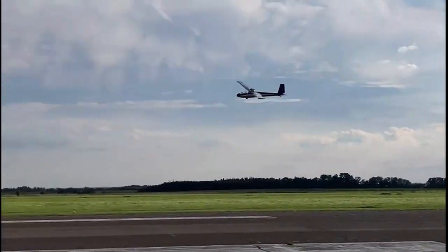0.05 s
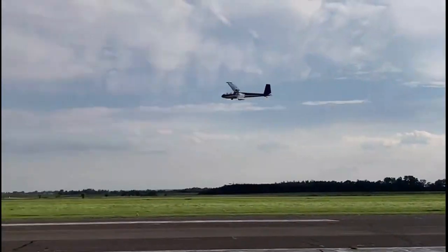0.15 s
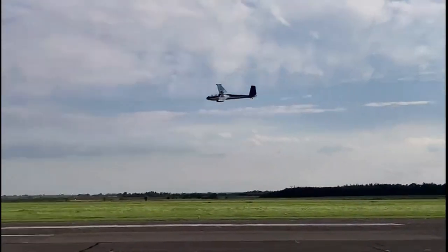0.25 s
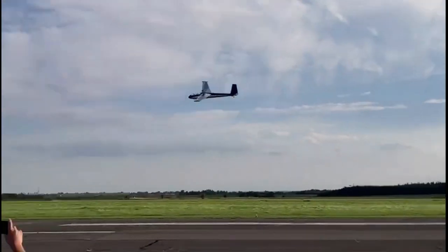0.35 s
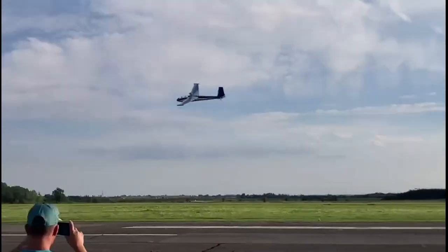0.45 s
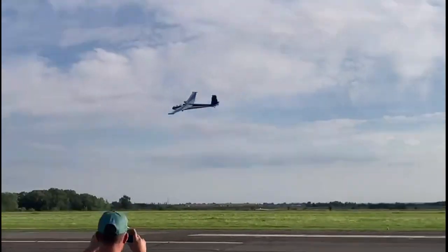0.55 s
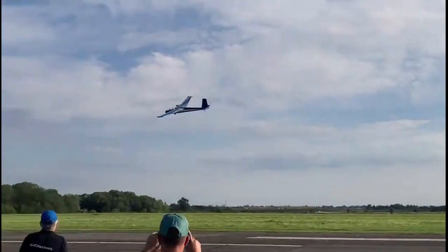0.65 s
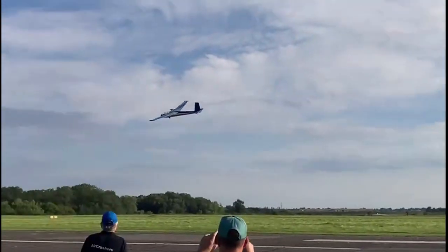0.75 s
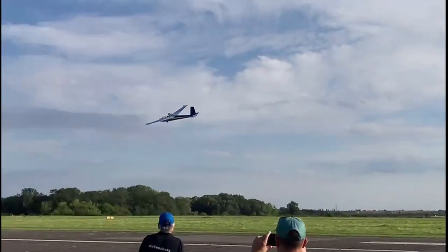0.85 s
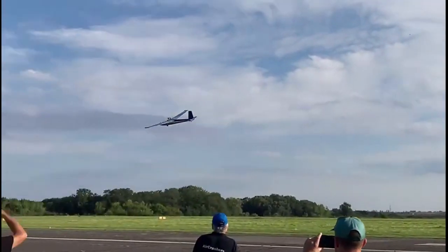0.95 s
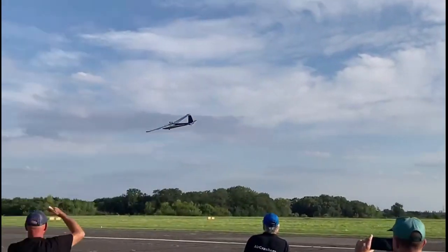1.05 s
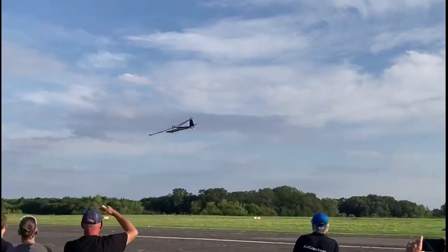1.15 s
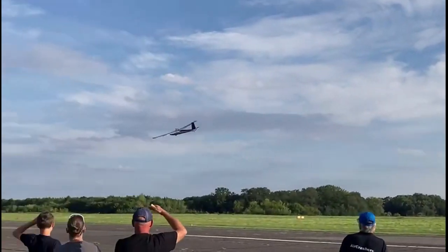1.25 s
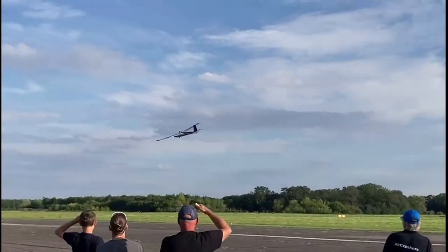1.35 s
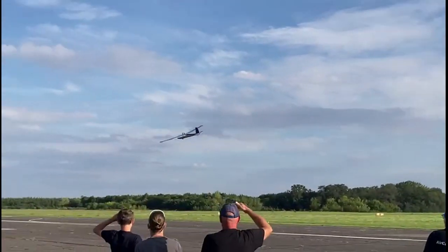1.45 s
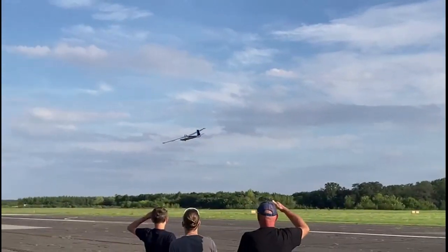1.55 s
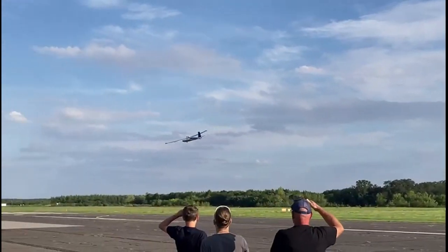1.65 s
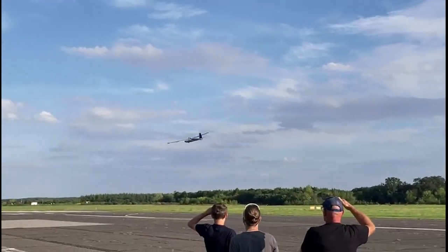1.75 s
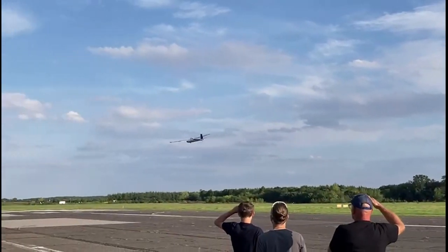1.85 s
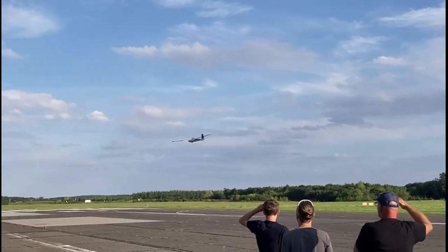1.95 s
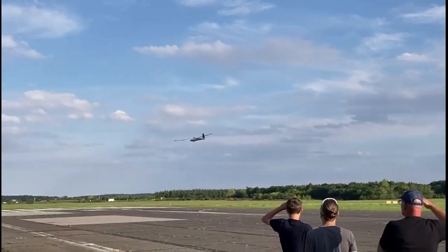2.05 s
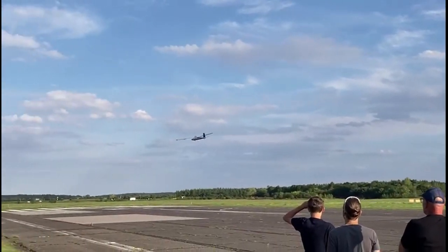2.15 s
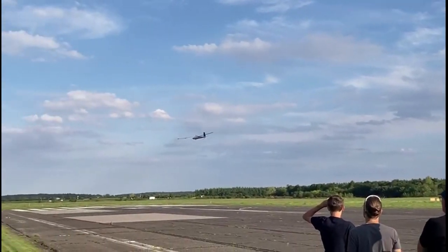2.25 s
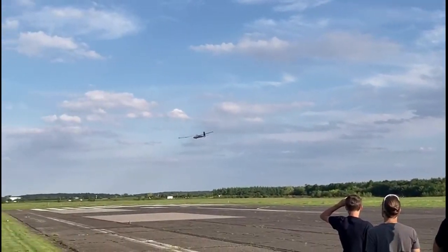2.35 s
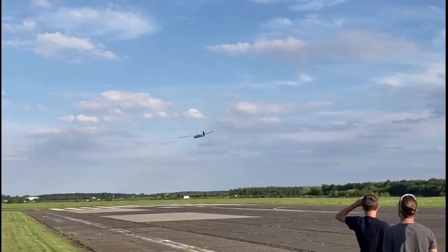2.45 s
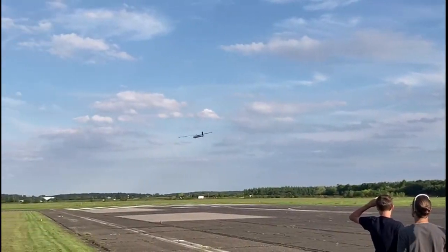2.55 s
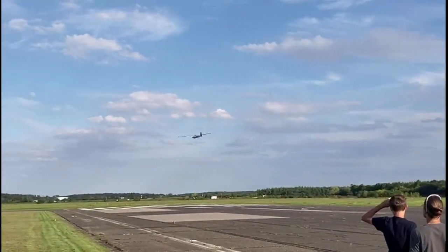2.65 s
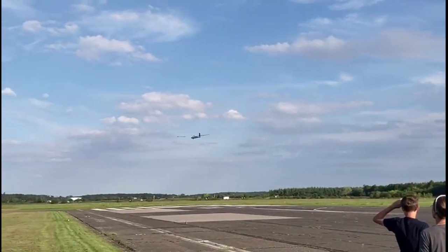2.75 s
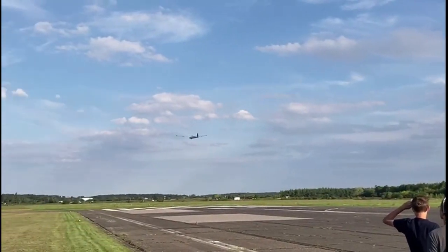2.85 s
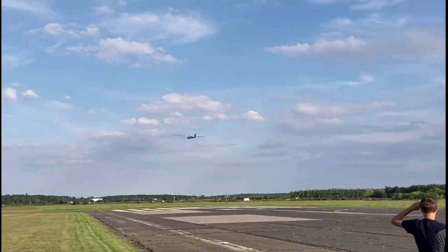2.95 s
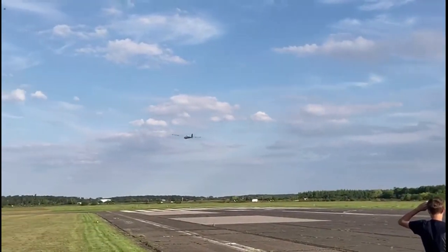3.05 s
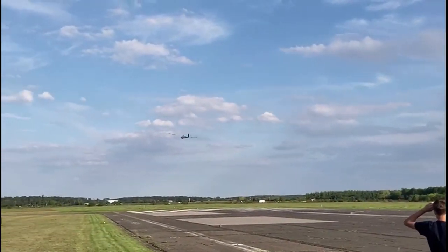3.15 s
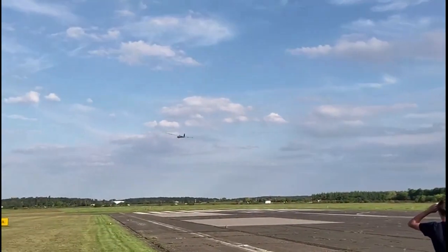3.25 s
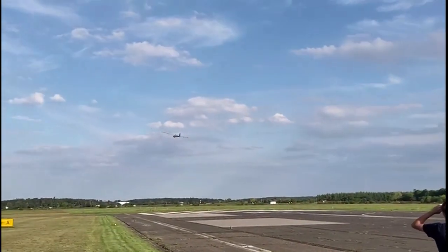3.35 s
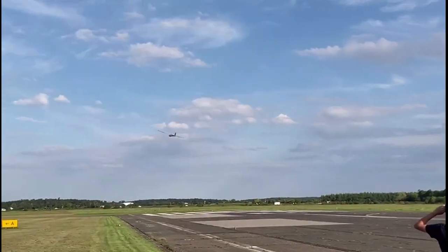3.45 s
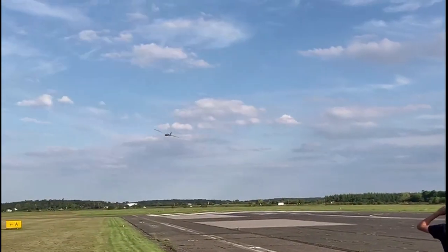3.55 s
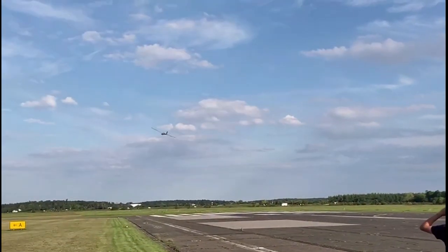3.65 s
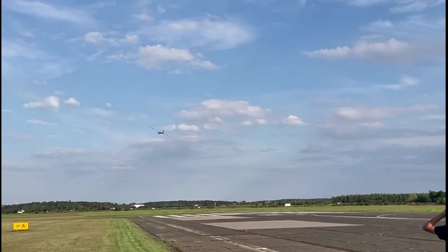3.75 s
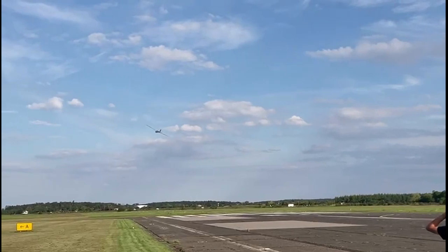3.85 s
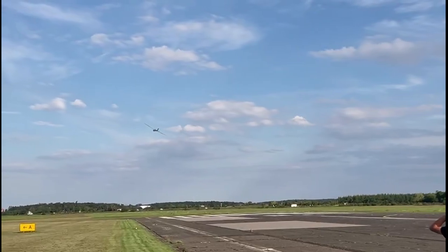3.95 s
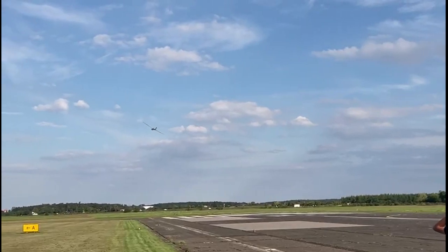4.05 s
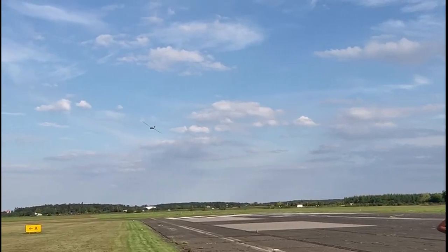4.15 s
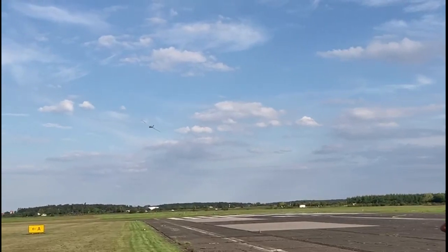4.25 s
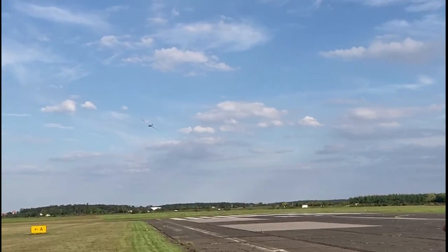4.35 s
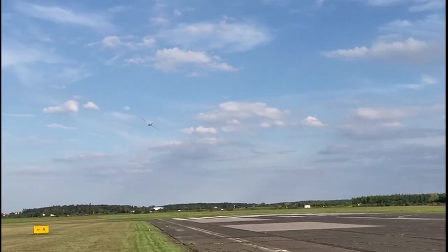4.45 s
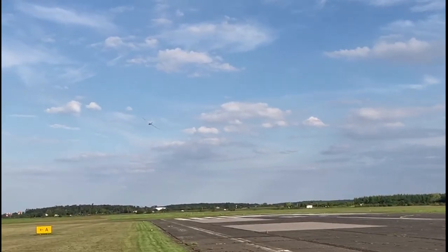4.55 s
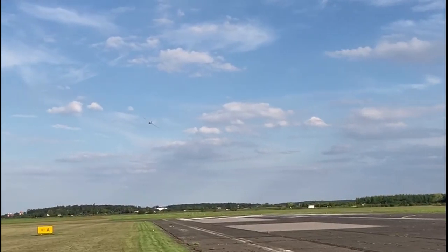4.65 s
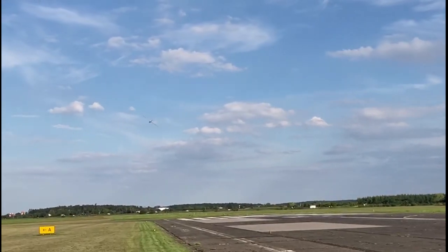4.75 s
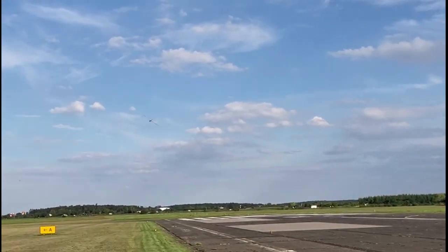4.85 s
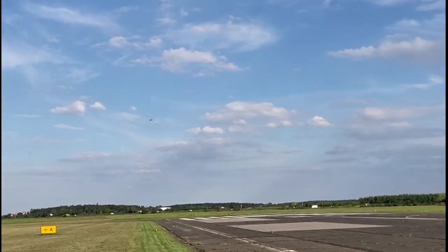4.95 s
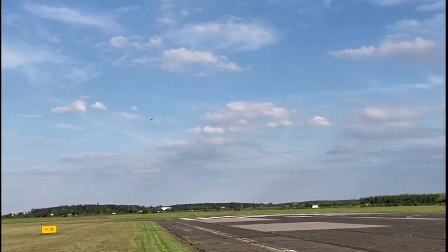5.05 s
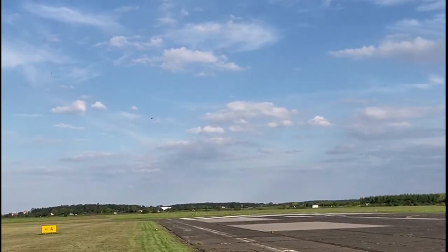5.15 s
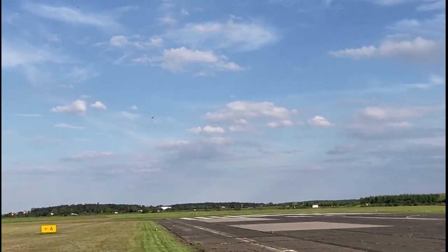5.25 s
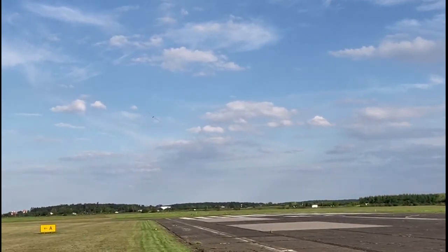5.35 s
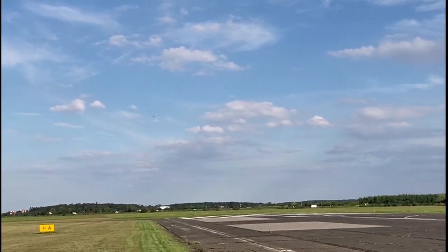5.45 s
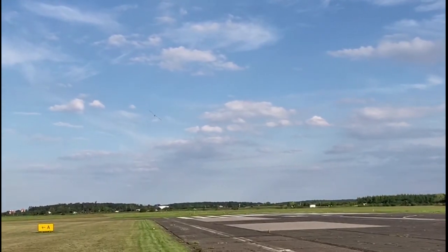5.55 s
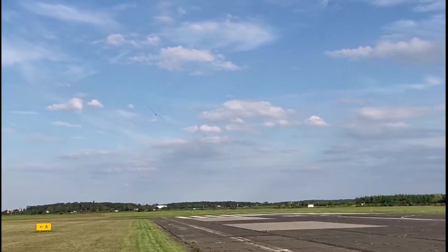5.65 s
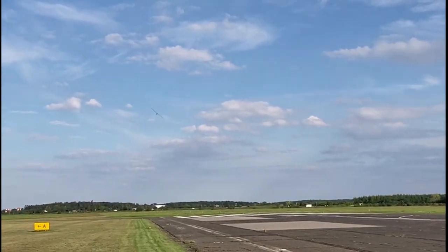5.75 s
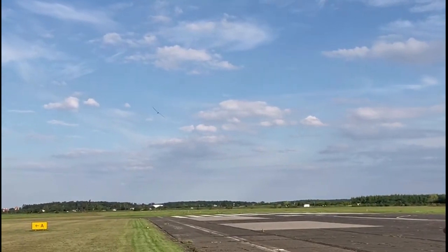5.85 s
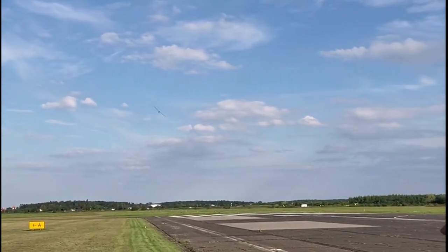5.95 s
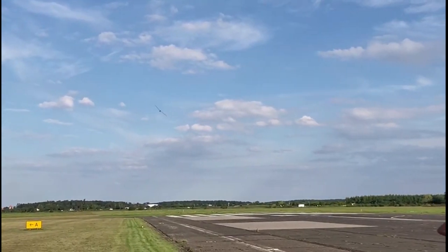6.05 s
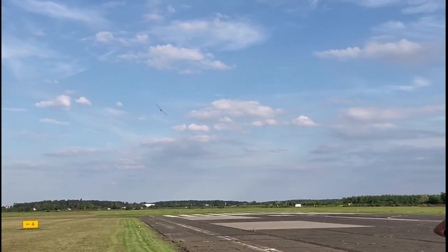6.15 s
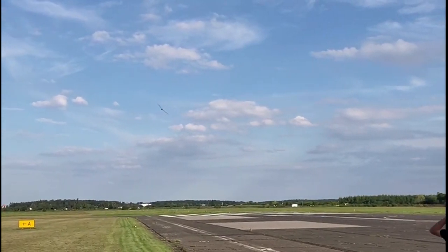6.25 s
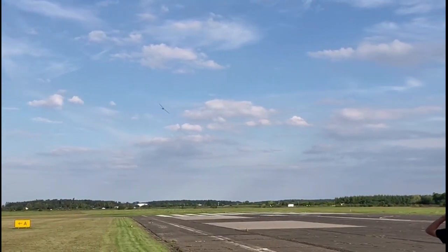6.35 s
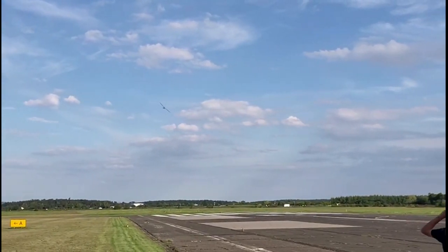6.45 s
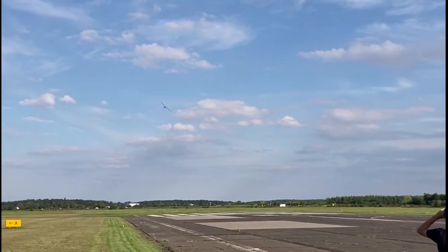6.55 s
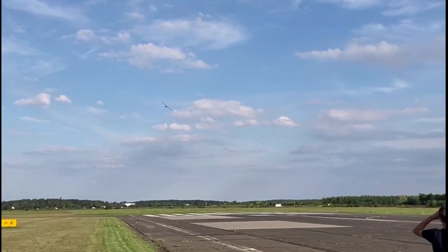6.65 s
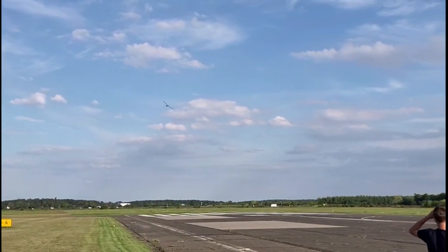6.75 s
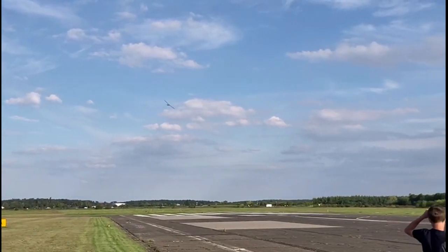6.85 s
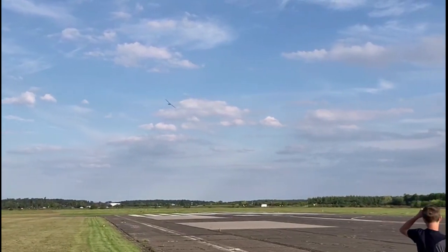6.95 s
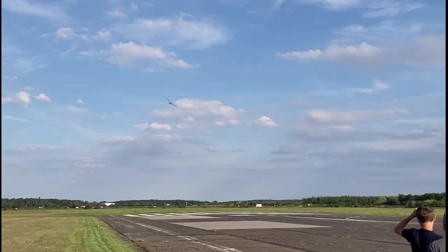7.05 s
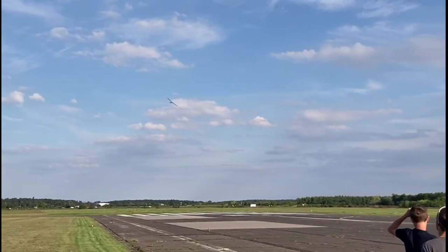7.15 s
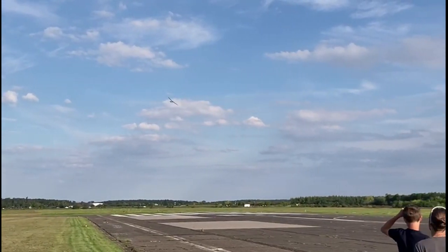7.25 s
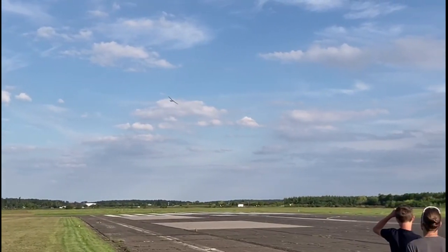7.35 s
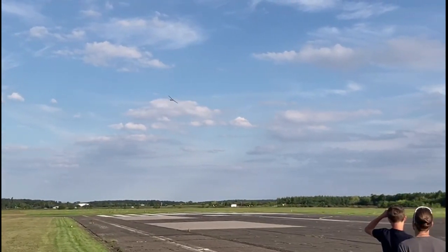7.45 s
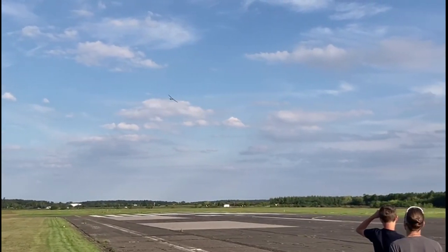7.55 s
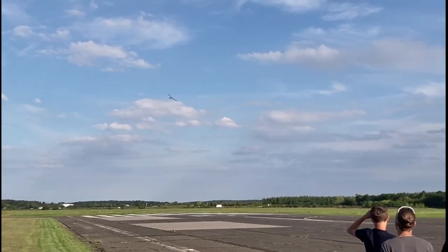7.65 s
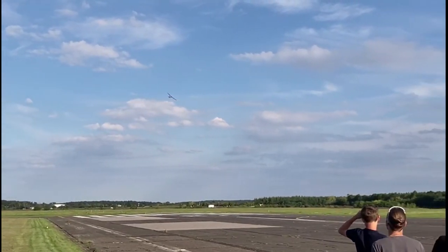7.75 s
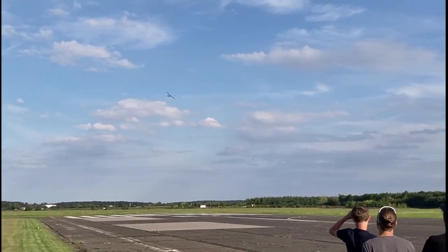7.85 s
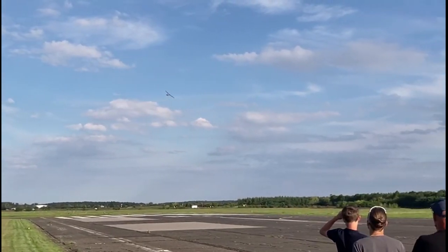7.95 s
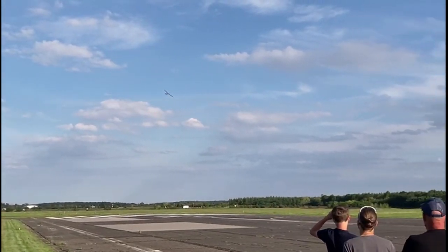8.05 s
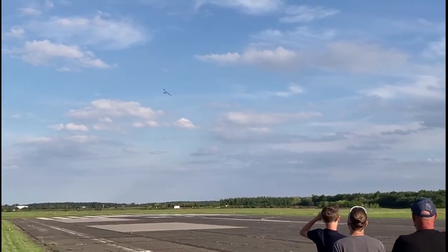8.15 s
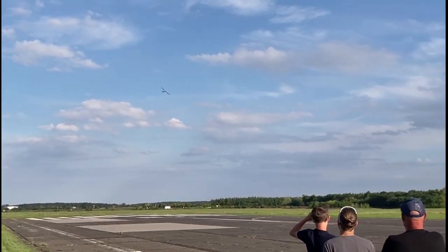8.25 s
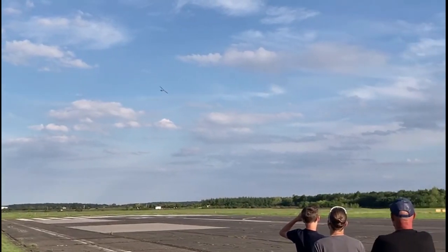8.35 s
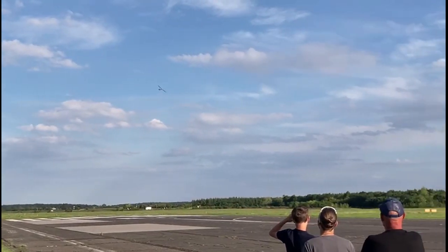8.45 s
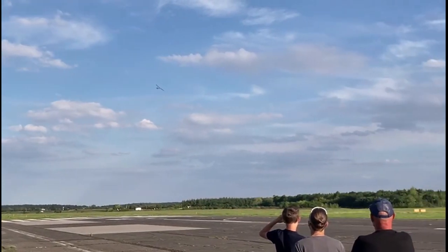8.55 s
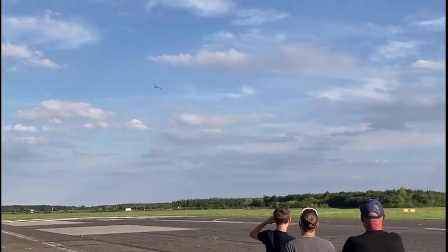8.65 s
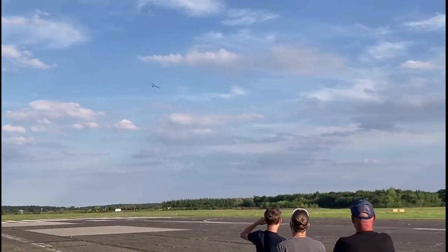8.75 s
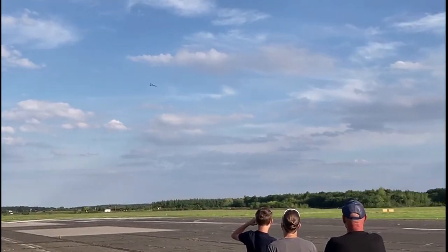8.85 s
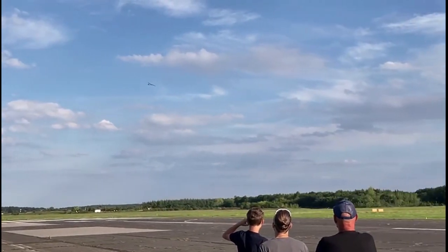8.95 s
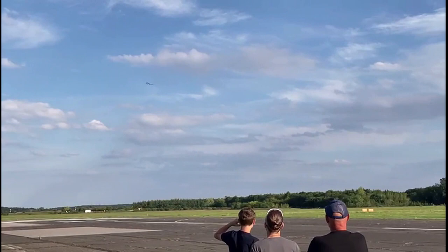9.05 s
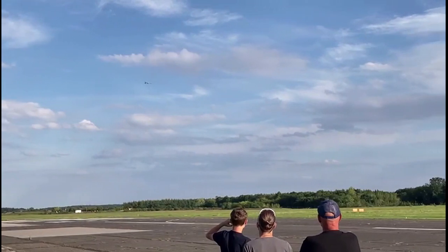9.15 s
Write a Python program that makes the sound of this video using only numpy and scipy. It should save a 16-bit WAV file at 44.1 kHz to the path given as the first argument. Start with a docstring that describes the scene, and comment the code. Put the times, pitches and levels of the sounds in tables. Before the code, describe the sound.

Rushing turbine noise and a thin high whistle pass close, then thin into distant sizzling hiss on an open airfield, with gusty wind rumble.

```python
"""On an open airfield a model glider with a small jet turbine passes low over the runway, flies off and turns back.
Its exhaust is shaped noise, heard directly and again off the ground; the delay between the two slides a comb.
The shaft adds a sine whose level and pitch wander, scattered into narrow-band noise by the exhaust.
Gusts of wind rumble and single eddies thump on a two-port microphone; the grass hushes faintly behind."""
import sys
import numpy as np
from scipy import signal
from scipy.io import wavfile
from scipy.ndimage import uniform_filter1d

SR = 44100
rng = np.random.default_rng(int(sys.argv[2]) if len(sys.argv) > 2 else 0)


def persist_wave(psi):
    """Save psi, clipped to +-1, as 16-bit WAV."""
    counts = np.round(np.clip(psi, -1, 1) * 32767).astype(np.int16)
    wavfile.write(sys.argv[1], SR, np.atleast_2d(counts).T)


N = 405719
TIME = np.arange(N) / SR  # s
FRAME, HOP = 2048, 512  # short-time spectra, samples
HZ = np.fft.rfftfreq(FRAME, 1 / SR)
FRAME_S = np.arange(N // HOP + 5)[:, None] * HOP / SR

# spectral shape of the jet mixing noise: [f/Hz, relative level/dB]
ROAR_SHAPE = [(80, -45), (230, -14), (400, -2.5), (640, 2), (850, -1.25), (1030, 2), (1500, 3.5), (2000, 3),
              (2400, 1), (2800, -4), (3300, -12), (4600, -12.5), (7000, -36.5)]
# base level of the roar, loudest just after the pass, with a swell in the turn: [t/s, level/dB per Hz]
ROAR_LEVEL = [(0, -68), (.6, -68), (1.15, -63.5), (1.62, -64), (2.1, -60), (2.5, -62), (3.1, -62.5),
              (3.7, -65.5), (4.3, -64), (4.7, -65), (5.3, -65), (6.1, -67), (7.0, -66.5), (7.3, -67),
              (7.65, -68), (8.22, -66.5), (8.6, -71.5), (9.2, -72)]
# spectral shape of the air rushing through the engine: [f/Hz, relative level/dB]
HISS_SHAPE = [(300, -38), (2500, -17), (3150, -1.5), (3550, -2), (4400, -6), (5200, -14), (6700, -2),
              (8500, 2), (10000, -1.5), (11200, -6.5)]
# base level of the treble hiss: [t/s, level/dB per Hz]
HISS_LEVEL = [(0, -72), (.35, -70.5), (.9, -68), (1.35, -68), (1.6, -73.5), (2.1, -67), (2.6, -74),
              (3.3, -71.5), (3.95, -67.5), (4.18, -67.5), (4.45, -66), (5.4, -61), (6.4, -67), (7.6, -82),
              (8.15, -68.5), (8.7, -71.5), (9.2, -67)]
# spectral shape of the airframe's low rush: [f/Hz, relative level/dB]
RUSH_SHAPE = [(100, -5.5), (230, -12.5), (350, 4.5), (450, -4.5), (700, -6.5), (1500, -15.5)]
# the rush swells as the airframe passes overhead: time and half length (s), base level (dB per Hz)
PASS_S, PASS_HALF_S, PASS_DB = 0.63, 0.76, -57
# bright tearing band of the exhaust, which comes and goes with the heading: [t/s, f/Hz, lift/dB]
TEARING_BAND = [(0, 4670, 7.5), (.6, 4370, -0.5), (1.2, 4330, 0.5), (1.6, 3800, -1), (2.1, 3870, 5),
                (3.2, 3800, 7.5), (3.95, 3640, 6.5), (4.17, 3600, -10.5), (4.45, 3500, -0.5),
                (5.3, 3540, -1.5), (7, 3480, 3), (7.6, 3400, 9.5), (8.3, 3880, 5.5), (9.2, 3890, 2.5)]
# just past the microphone the exhaust flares: time and half length (s), centre and width (Hz), lift (dB)
FLARE_S, FLARE_HALF_S, FLARE_HZ, FLARE_WIDTH_HZ, FLARE_DB = 1.05, 0.23, 2600, 590, 3
# sizzling treble band, which comes and goes in the distance: [t/s, lift/dB]
SIZZLE_LIFT = [(.5, -5.5), (1.3, 2.5), (2.4, 1.5), (3.2, 7), (3.6, 10), (4.05, 10), (4.7, 11.5), (4.95, 9),
               (5.3, 15.5), (5.75, 7), (6.3, 15), (7.05, 11), (7.25, 11), (7.5, -3), (7.8, 6), (8.4, -3),
               (9.2, 12.5)]
SIZZLE_HZ, SIZZLE_WIDTH_HZ = 5760, 730
# dulling of the treble, deepest at 5.75 s: [t/s, loss at 10 kHz/dB, below 0 acts as 0]
TREBLE_LOSS = [(0, 4.5), (1, -5), (3.1, 3), (4.0, 22), (4.7, 31.5), (5.3, 58.5), (5.75, 87), (6.3, 55.5),
               (7.5, 22), (8.3, 33.5), (9.2, 47.5)]


def jet(flutter_db=0.57, patchy_db=2.0, tearing_width_hz=600):
    """Incoherent sources add in power; treble loss, ground interference and turbulence then shape the sum."""
    roar = gain_of(at_time(ROAR_LEVEL, FRAME_S)[0] + at_hz(ROAR_SHAPE))
    hiss = gain_of(at_time(HISS_LEVEL, FRAME_S)[0] + at_hz(HISS_SHAPE))
    rush = gain_of(PASS_DB + at_hz(RUSH_SHAPE)) * swell(FRAME_S, PASS_S, PASS_HALF_S)
    tearing_hz, lift_db = at_time(TEARING_BAND, FRAME_S)
    tearing_db = lift_db * swell(HZ, tearing_hz, tearing_width_hz)
    flare_db = FLARE_DB * swell(FRAME_S, FLARE_S, FLARE_HALF_S) * swell(HZ, FLARE_HZ, FLARE_WIDTH_HZ)
    sizzle_db = at_time(SIZZLE_LIFT, FRAME_S)[0] * swell(HZ, SIZZLE_HZ, SIZZLE_WIDTH_HZ)
    lifts_db = tearing_db + flare_db + sizzle_db + shrill_db()
    source = np.sqrt(roar ** 2 + hiss ** 2 + rush ** 2) * gain_of(lifts_db)
    loss_db = np.maximum(at_time(TREBLE_LOSS, FRAME_S)[0], 0) * HZ / 10 ** 4
    # turbulence shakes the treble most, partly as a whole and partly in patches; depths hold at 4 kHz
    flutter_whole = flutter_db * drift(FRAME_S, 18)
    flutter_patches = patchy_db * patches(size=(5, 40))
    flutter = (flutter_whole + flutter_patches) * np.sqrt(HZ / 4000)
    return to_sound(port_noise() * source * gain_of(flutter - loss_db) * ground_comb())


# upper of two shrill engine resonances: [t/s, f/Hz, lift/dB, below 0 acts as 0]
SHRILL_RESONANCE = [(1.3, 6820, -1.5), (1.7, 6860, 7), (2.25, 6800, 4), (2.65, 6770, 10), (3.05, 7160, 12),
                    (3.5, 7300, 11.5), (4.9, 7400, -6), (5.7, 7350, 24.5), (6.6, 7500, 14), (7.3, 7130, 15),
                    (8.1, 6800, 16.5), (9.2, 6580, 12.5)]


def shrill_db(width_hz=480, lower_ratio=0.88, lower_width_hz=220, lower_share=0.43):
    """Resonance: two broad peaks at a fixed frequency ratio slide together."""
    hz, lift_db = at_time(SHRILL_RESONANCE, FRAME_S)
    upper = swell(HZ, hz, width_hz)
    lower = swell(HZ, lower_ratio * hz, lower_width_hz)
    return np.maximum(lift_db, 0) * (upper + lower_share * lower)


# reflection from the ground: [f/Hz, base share of the direct amplitude, phase turned by the grass/rad]
GROUND_REFLECTION = [(300, .45, -.3), (500, .5, -.66), (800, 1, .65), (1100, .72, .63), (1500, .85, -.07),
                     (2000, .82, -.15), (2800, .95, -.4), (3500, .66, -.68), (4300, .68, -1.8),
                     (6000, .18, -1.8), (11000, .14, -1.8)]
# echo geometry, by height and range: [t/s, comb spacing = 1 / delay/Hz, treble phase lag/rad, factor on share]
ECHO_PATH = [(0, 447, -1.43, .84), (.3, 422, -.95, .93), (.55, 418, -.83, .88), (.8, 430, 0, .6),
             (1.0, 466, -.2, .83), (1.25, 480, -2.06, .88), (1.5, 549, -1.34, .81), (1.8, 634, -.81, .55),
             (2.1, 686, -1.53, .9), (2.35, 746, -.35, .75), (2.6, 676, -.77, .83), (2.8, 692, -.43, .85),
             (3.0, 711, -.2, .9), (3.2, 668, -.25, 1.15), (3.6, 663, .39, 1), (4.0, 667, .81, .8),
             (4.4, 611, .33, .9), (4.8, 600, .62, .65), (5.7, 572, .32, .75), (6.5, 575, .84, .45),
             (7.0, 531, .13, .62), (7.5, 513, .43, 1.15), (8.0, 496, .06, .95), (8.5, 481, -.52, .88),
             (9.2, 458, -1.29, .7)]
ECHO_MOST, ECHO_LAG_HZ = .88, 450  # largest share; where the lag sets in


def ground_comb():
    """Two-path interference: direct and reflected waves cancel at evenly spaced notches, bent by the grass."""
    spacing_hz, lag, strength = at_time(ECHO_PATH, FRAME_S)
    turn = 2 * np.pi * HZ / spacing_hz
    grass = lag * np.tanh(HZ / ECHO_LAG_HZ) + at_hz(GROUND_REFLECTION, axis=2)
    share = np.minimum(at_hz(GROUND_REFLECTION) * strength, ECHO_MOST)
    main = 1 + share * np.exp(1j * (turn + grass))
    return abs(main * (1 + stray_echoes(turn)))


# joint rms share of the stray echoes; nominal shortest and longest delay in multiples of the main echo's
STRAY_SHARE, STRAY_NEAR, STRAY_FAR = .13, 1.6, 6


def stray_echoes(turn, count=8):
    """Scattering: uneven ground returns weak echoes of drifting phase, drawing fine strands in the roar."""
    delays = np.geomspace(STRAY_NEAR, STRAY_FAR, count) * rng.uniform(.9, 1.1, count)
    total = 0
    for delay in delays:
        phase = delay * turn + 2 * np.pi * rng.random() + drift(FRAME_S, 2.2)
        total = total + np.exp(1j * phase)
    return STRAY_SHARE * evened(total)


# shaft tone, shifted by throttle and motion, strong in the pass, from behind and in the turn:
# [t/s, f/Hz, mean level/dB, fuzzy share of power 0-1]
SHAFT_TONE = [(0, 2229, -38, 0), (.3, 2191, -33.3, 0), (.63, 2148, -33.5, 0), (.85, 2193, -34.5, 0),
              (1.15, 2219, -35, 0), (1.4, 2217, -32, 0), (1.55, 2215, -38, 0), (1.75, 2212, -60, 0),
              (2.95, 2600, -62, 1), (3.22, 2650, -33, .9), (3.5, 2670, -39.5, .6), (3.95, 2676, -44, .5),
              (4.8, 2678, -58, .4), (5.1, 2680, -85, 0), (7.0, 2670, -75, 0), (7.4, 2648, -60, 0),
              (7.75, 2612, -56, 0), (7.95, 2595, -50, 0), (8.3, 2572, -49.5, .05), (8.75, 2549, -54.5, .05),
              (8.97, 2541, -61, 0), (9.2, 2528, -51, 0)]
WAVER_DB = 1.0  # rms waver of the whine in turbulence


def whine(fuzz_hz=45):
    """Scattering of a tone: a clean line ahead of the engine, broadened by the exhaust behind it."""
    hz, db, fuzz = at_time(SHAFT_TONE, TIME)
    fuzz = np.clip(fuzz, 0, 1)
    low_pass = signal.butter(2, fuzz_hz, fs=SR, output="sos")
    scatter = evened(signal.sosfilt(low_pass, rng.standard_normal((N, 2)) @ [1, 1j]))
    carrier = np.exp(2j * np.pi * np.cumsum(hz) / SR)
    tone = carrier * (np.sqrt(1 - fuzz) + np.sqrt(fuzz) * scatter)
    level = gain_of(db + WAVER_DB * drift(TIME, 12))
    return port_gains(hz) * np.sqrt(2) * tone.real * level


# difference of the wind between the ports: [f/Hz, side minus middle level/dB]
WIND_SIDE = [(40, -56), (90, -38), (180, -27), (330, -10)]


def wind(level_db=3.0, lumpy_db=1.0):
    """Turbulent pressure on the microphone: large eddies press both ports alike, small ones differ."""
    middle = white()
    side = white() * gain_of(at_hz(WIND_SIDE))
    rumble = evened(to_sound(np.array([middle + side, middle - side]) * wind_colour()))
    return rumble * gain_of(level_db + wind_db(TIME) + lumpy_db * drift(TIME, 20))


# breeze between the gusts: [t/s, level before the wind's common lift/dB]
BREEZE_LEVEL = [(0, -40.5), (.55, -48.5), (1.1, -37.5), (2.1, -34.5), (3.2, -32.5), (3.55, -49.5),
                (4.1, -35.5), (4.45, -34.5), (4.72, -50), (4.95, -39), (5.35, -46.5), (6.2, -51),
                (6.9, -49), (7.15, -43.5), (8.0, -49), (8.6, -35.5), (9.2, -38)]
# gusts that swell and drop: [t/s, half length/s, level before the common lift/dB, upper edge f/Hz]
GUST_LIST = [(0.293, 0.048, -25.5, 150), (0.803, 0.025, -31.5, 192), (1.406, 0.11, -26, 154),
             (1.57, 0.067, -27, 150), (1.853, 0.097, -23, 220), (2.052, 0.024, -27.5, 180),
             (2.197, 0.03, -32, 189), (2.604, 0.017, -19.5, 162), (2.925, 0.075, -20.5, 199),
             (3.009, 0.015, -16, 162), (3.074, 0.042, -21, 140), (3.17, 0.015, -30, 185),
             (3.42, 0.025, -37, 109), (3.536, 0.015, -35.5, 140), (3.76, 0.047, -32.5, 90),
             (3.982, 0.046, -26.5, 135), (4.273, 0.044, -22, 110), (4.609, 0.015, -34, 130),
             (4.892, 0.026, -38.5, 115), (5.035, 0.057, -32, 120), (5.175, 0.046, -38.5, 111),
             (5.524, 0.048, -31.5, 85), (5.75, 0.086, -41.5, 85), (7.19, 0.047, -36.5, 112),
             (7.29, 0.04, -41.5, 153), (7.437, 0.027, -40.5, 125), (7.57, 0.044, -39.5, 110),
             (8.646, 0.045, -43.5, 85), (8.852, 0.017, -28, 85), (9.03, 0.025, -33.5, 100)]


def wind_db(t):
    """Addition of powers: the gusts ride on the breeze."""
    power = gain_of(at_time(BREEZE_LEVEL, t)[0]) ** 2
    for s, half_s, db, _ in GUST_LIST:
        power = power + (gain_of(db) * swell(t, s, half_s)) ** 2
    return 10 * np.log10(power)


# spectral shape of the rumble in a light breeze: [f/Hz, relative level/dB]
RUMBLE_SHAPE = [(12, -47), (25, -17), (48, 5), (62, 5.5), (120, -5.5), (200, -15), (320, -27.5),
                (500, -64.5), (1000, -90)]


def wind_colour(calm_db=-38, db_per_octave=22, peak_hz=58, gust_slope=3.06, gust_tilt=0.32):
    """Frequency scaling with wind speed: a fresher breeze reaches higher; each gust falls off at its own edge."""
    def unit(colour):
        return colour / np.linalg.norm(colour, axis=-1, keepdims=True)
    breeze_db = at_time(BREEZE_LEVEL, FRAME_S)[0]
    stretch = 2 ** (np.maximum(breeze_db - calm_db, 0) / db_per_octave)
    # only the slope above the peak is stretched
    shape_hz = np.maximum(HZ / stretch, np.minimum(HZ, peak_hz))
    power = (gain_of(breeze_db) * unit(gain_of(at_hz(RUMBLE_SHAPE, shape_hz)))) ** 2
    rise = np.minimum(HZ / peak_hz, 1) ** 2
    tilt = np.maximum(HZ / peak_hz, 1) ** gust_tilt
    for s, half_s, db, edge_hz in GUST_LIST:
        colour = rise / tilt / np.hypot(1, (HZ / edge_hz) ** gust_slope)
        power = power + (gain_of(db) * swell(FRAME_S, s, half_s) * unit(colour)) ** 2
    return unit(np.sqrt(power))


# eddies that hit the microphone: [t/s, envelope peak before the bass roll-off/dB, f at centre/Hz, half length/s]
EDDIES = [(0.976, -15.5, 130, 0.0017), (1.385, -18, 170, 0.0029), (1.81, -13.5, 190, 0.02),
          (2.296, -9, 240, 0.0033), (2.607, -4.5, 117, 0.0037), (2.938, -11, 213, 0.0051),
          (3.002, -19.5, 397, 0.0043), (3.012, -9.5, 92, 0.0088), (3.089, -16, 101, .0081),
          (3.094, -22, 350, 0.0025), (4.038, -20.5, 274, 0.0081), (4.278, -12, 68, 0.012),
          (4.287, -24, 256, 0.004), (4.599, -17.5, 70, 0.0028), (5.03, -17.5, 109, 0.0081),
          (7.163, -27, 80, 0.012), (7.436, -25.5, 95, 0.005)]


def buffets():
    """Transient pressure: each eddy is a short swing under a bell envelope that slows as it passes."""
    out = np.zeros(N)
    for s, db, hz, length in EDDIES:
        near = abs(TIME - s) < 4 * length
        u = (TIME[near] - s) / length
        turns = hz * length * (u - 0.077 * u ** 2) + rng.random()
        out[near] += gain_of(db) * np.exp(-u ** 2) * np.cos(2 * np.pi * turns)
    return out


# breeze in the grass of the open field: [f/Hz, mean level/dB per Hz]
GRASS_HUSH = [(100, -90.5), (300, -91), (520, -80), (750, -87), (1000, -83), (2200, -105), (4500, -104),
              (5500, -107), (7450, -106), (8500, -108), (10000, -122)]


def field(swell_db=1.0):
    """Ambient noise: a faint stationary spectrum whose level slowly swells."""
    return to_sound(port_noise() * gain_of(at_hz(GRASS_HUSH) + swell_db * drift(FRAME_S, 3)))


# left-right likeness: [f/Hz, coherence 0-1]
PORT_LIKENESS = [(200, 1), (400, .95), (1000, .94), (2000, .88), (2900, .65), (3800, .85), (4800, .6),
                 (5600, .85), (6100, .8), (6450, .6), (6900, 1), (7400, .98), (8000, .65), (8550, 1),
                 (9700, 1), (10250, .65), (10700, 1)]
# phase of left against right, by frequency: [f/Hz, early phase/rad, extra later/rad]
LEFT_PHASE = [(800, 0, 0), (2300, .2, 1.1), (3600, -.1, .6), (4400, 0, 1), (4900, -.5, 3.3), (5300, 0, 3.1),
              (6150, .4, 2.6), (6650, 0, .1), (7500, 0, 0), (8500, -3.14, 0), (9750, -3.14, 0),
              (10600, -6.28, 0)]
# narrow dip in the microphone's response
DIP_HZ, DIP_WIDTH_HZ, DIP_DB = 3220, 130, -2.5


def port_noise():
    """Partial coherence: left and right share part of a noise, and their relative phase shifts from 2.8 to 5 s."""
    later = np.interp(FRAME_S, [2.8, 5], [0, 1])
    phase = at_hz(LEFT_PHASE) + later * at_hz(LEFT_PHASE, axis=2)
    same = np.clip(at_hz(PORT_LIKENESS), 0, 1)
    left = white()
    right = same * left + np.sqrt(1 - same ** 2) * white()
    dip = gain_of(DIP_DB * swell(HZ, DIP_HZ, DIP_WIDTH_HZ))
    return np.array([left * np.exp(1j * phase), right]) * port_gains(HZ)[:, None] * dip


# balance of the two ports: [f/Hz, left minus right level/dB]
PORT_BALANCE = [(300, 0), (630, 2.5), (1120, 8.3), (2020, 9.2), (2900, 6.5), (3600, 0), (11000, 0)]


def port_gains(hz):
    """Level difference: left and right gains at constant total power."""
    ratio = gain_of(at_hz(PORT_BALANCE, hz))
    return np.array([ratio, np.ones_like(ratio)]) * np.sqrt(2 / (1 + ratio ** 2))


def gain_of(db):
    """Logarithmic level: decibels to amplitude."""
    return 10 ** (np.asarray(db) / 20)


def evened(x):
    """Normalization to rms 1."""
    return x / np.sqrt(np.mean(abs(x) ** 2) + 1e-20)


def at_time(rows, t):
    """Linear interpolation: every column of a curve at the times t."""
    s, *columns = np.transpose(rows)
    return [np.interp(t, s, c) for c in columns]


def at_hz(rows, hz=HZ, axis=1):
    """Interpolation of one spectrum column on a log-frequency axis."""
    columns = np.transpose(rows)
    return np.interp(np.log(hz + 1), np.log(columns[0] + 1), columns[axis])


def swell(x, centre, half_width):
    """Gaussian bell of height 1 in time or frequency."""
    return np.exp(-((x - centre) / half_width) ** 2)


def drift(t, rate_hz):
    """Superposition: sines of random phase up to about a rate make a slow random curve of rms 1."""
    rates = rate_hz * np.geomspace(1 / 10, 1, 20) * rng.uniform(.9, 1.1, 20)
    return evened(sum(np.sin(2 * np.pi * (f * t + rng.random())) / np.sqrt(f) for f in rates))


def white():
    """White noise: random short-time spectra of power 1."""
    return evened(rng.standard_normal((len(FRAME_S), len(HZ), 2)) @ [1, 1j])


def patches(size):
    """Local averaging: random blotches over time and frequency, of size (frames, bins)."""
    over_time = uniform_filter1d(white().real, size[0], 0)
    return evened(uniform_filter1d(over_time, size[1], 1))


def to_sound(z):
    """Overlap-add synthesis: short-time spectra (amplitude per root Hz) to samples."""
    x = signal.istft(np.swapaxes(z, -1, -2), nperseg=FRAME, noverlap=FRAME - HOP)[1]
    return x[..., :N] * np.sqrt(3 * SR / FRAME)


def scene():
    """Superposition: the aircraft, the field, and the wind behind the microphone's bass roll-off."""
    roll_off = signal.butter(3, 42, "highpass", fs=SR, output="sos")
    air = signal.sosfilt(roll_off, wind() + buffets())
    return jet() + whine() + field() + air


EDGE_HZ = 11850


def record(dry):
    """Band limiting: a linear-phase low-pass removes the sound above the edge."""
    low_pass = signal.firwin(511, EDGE_HZ, window=("kaiser", 9), fs=SR)
    return signal.oaconvolve(dry, low_pass[None], "same", axes=1)


dry = scene()
out = record(dry)
persist_wave(out)
```